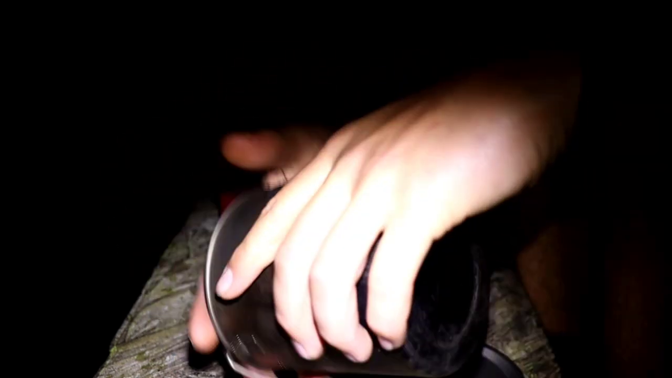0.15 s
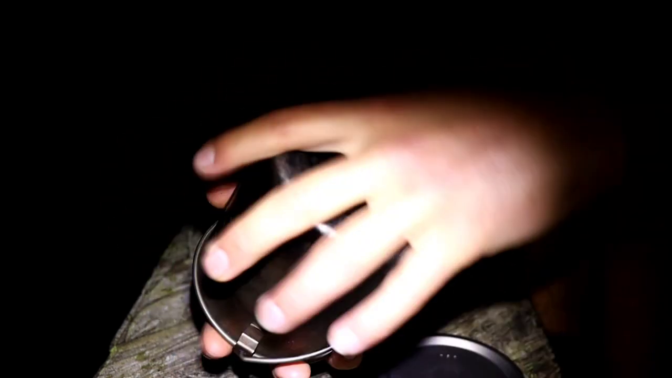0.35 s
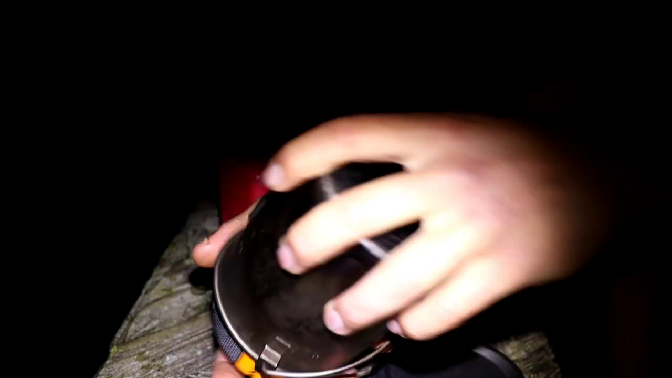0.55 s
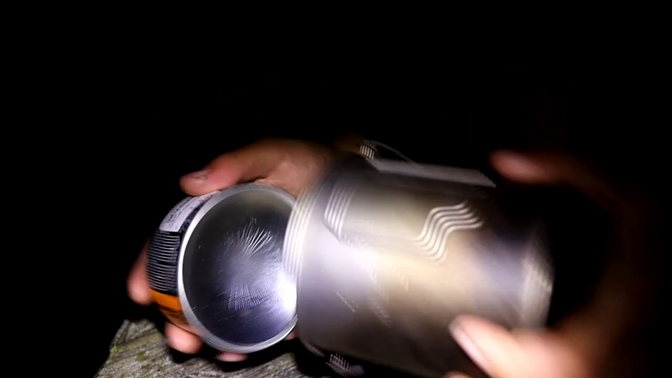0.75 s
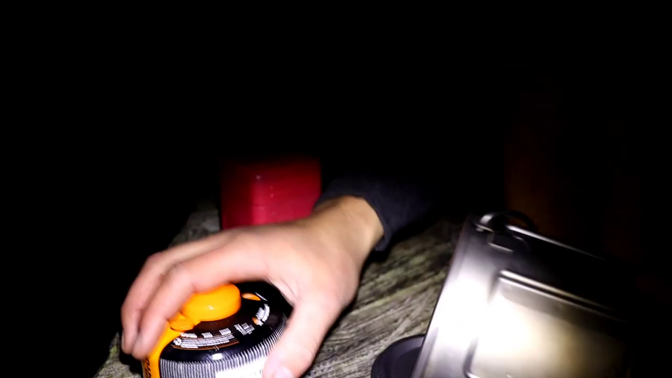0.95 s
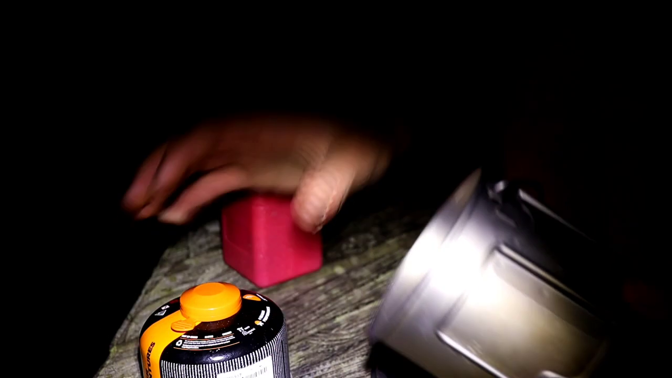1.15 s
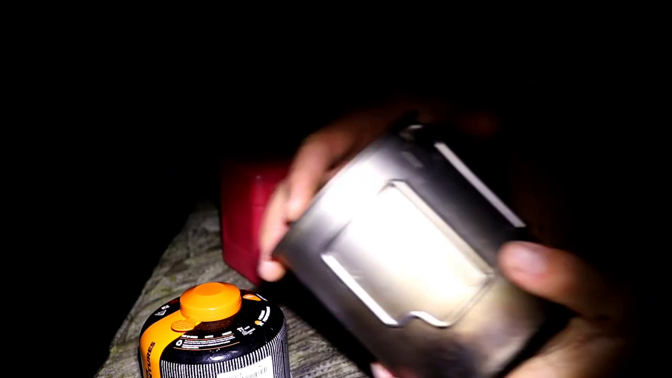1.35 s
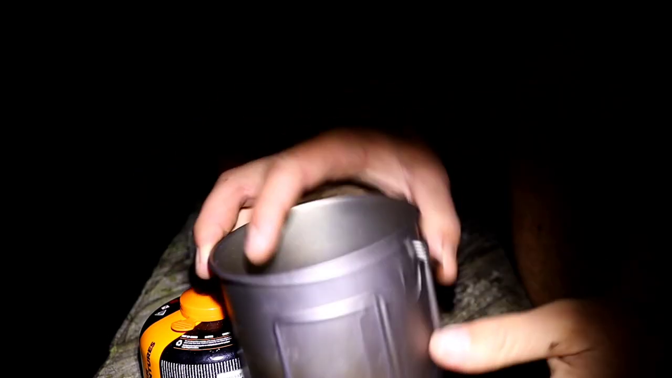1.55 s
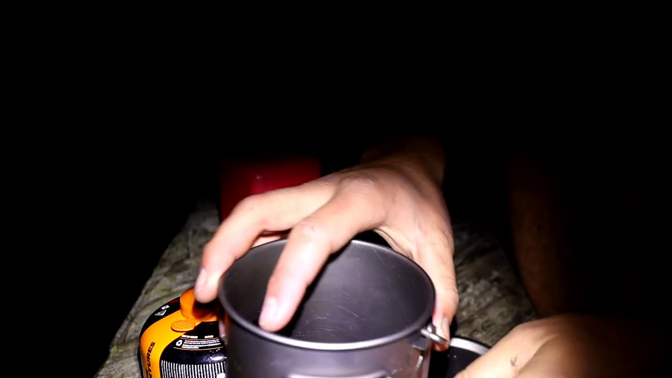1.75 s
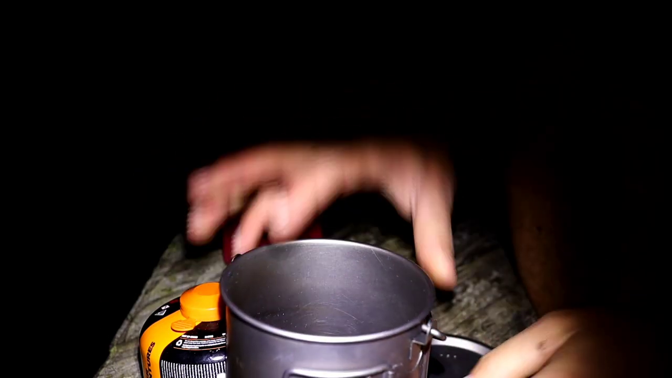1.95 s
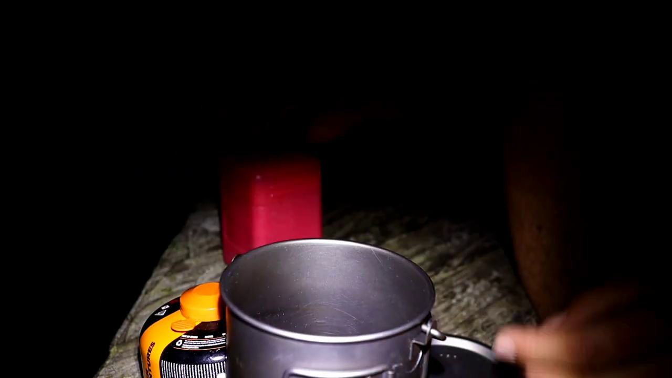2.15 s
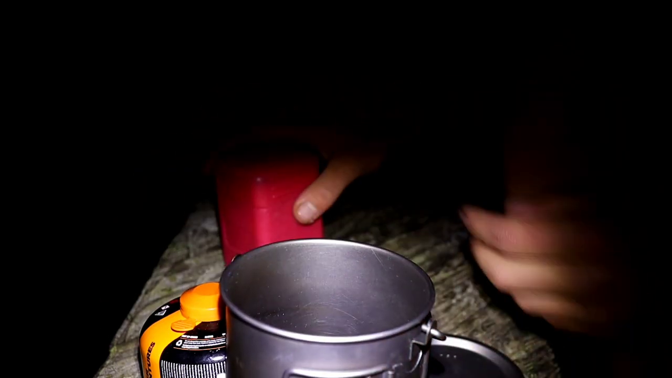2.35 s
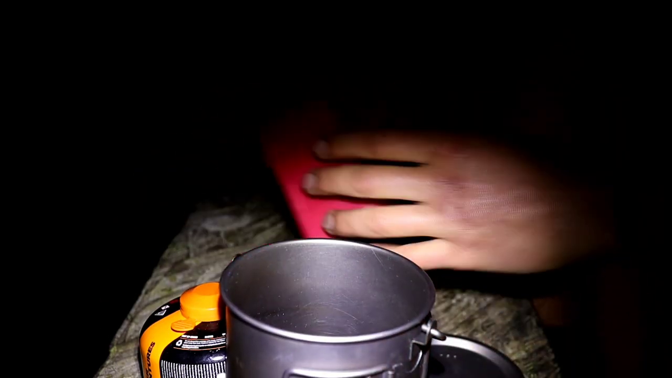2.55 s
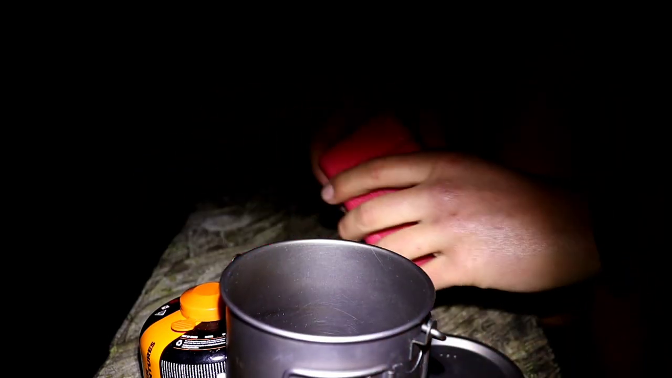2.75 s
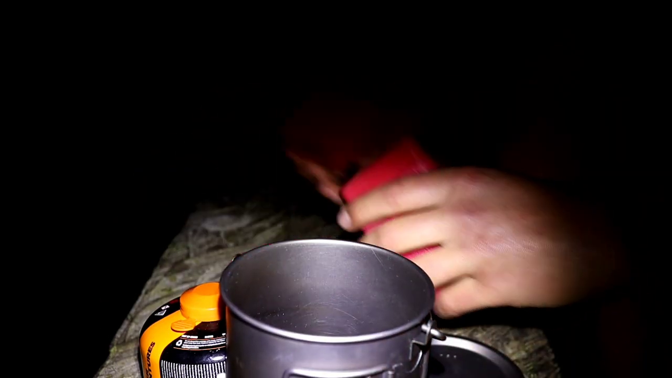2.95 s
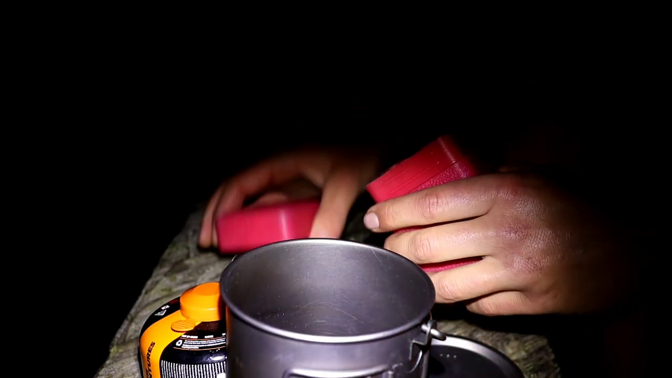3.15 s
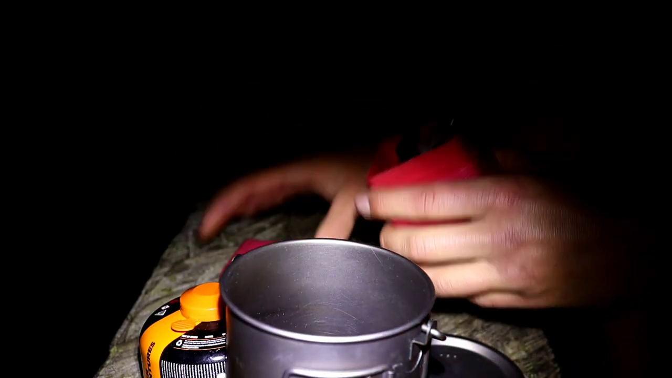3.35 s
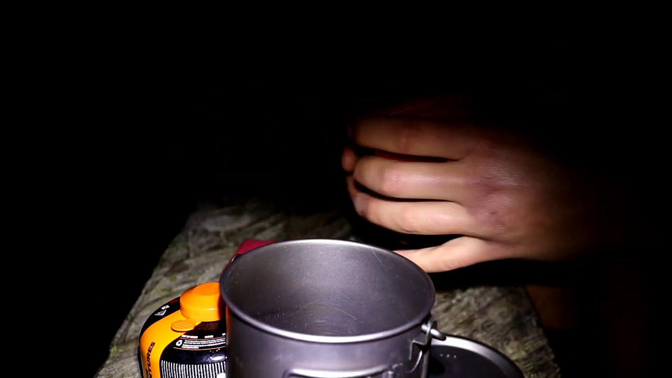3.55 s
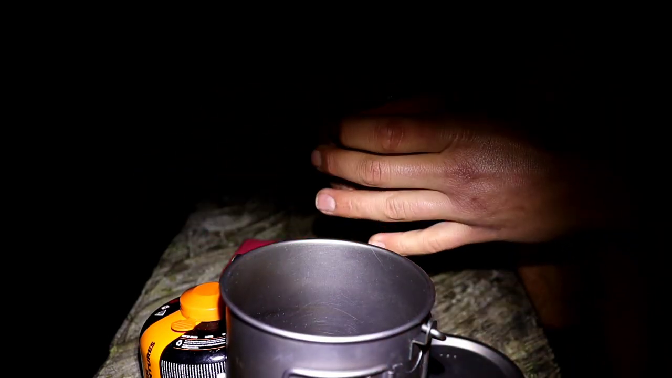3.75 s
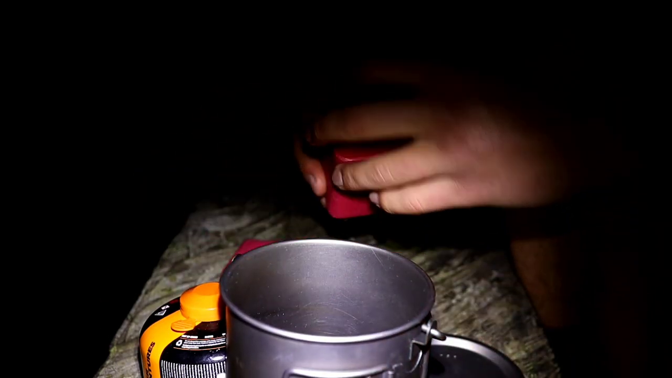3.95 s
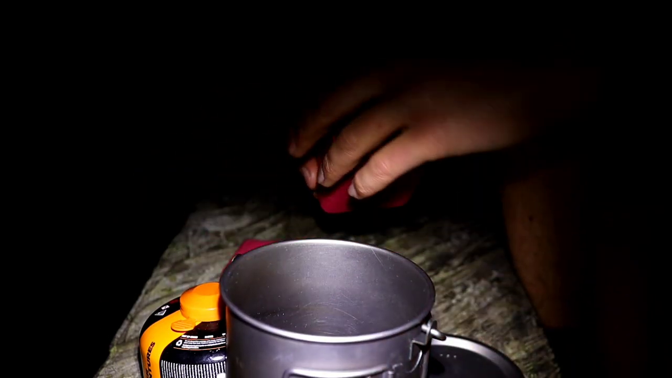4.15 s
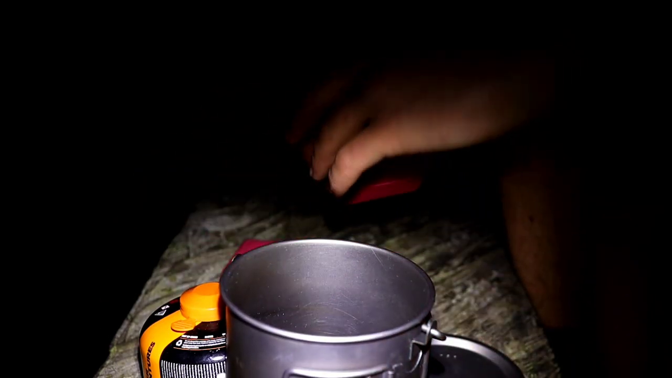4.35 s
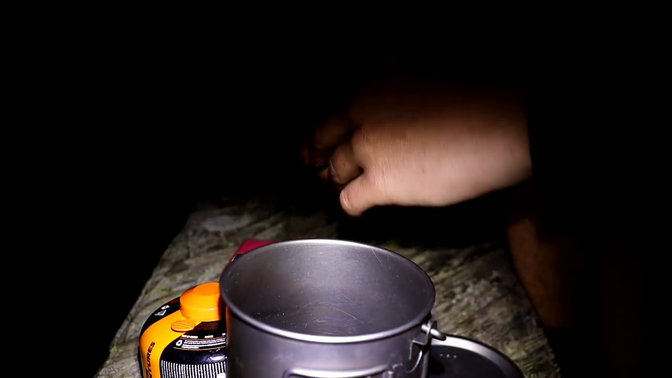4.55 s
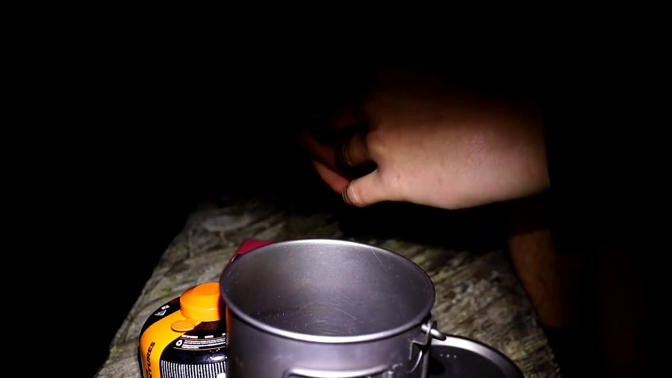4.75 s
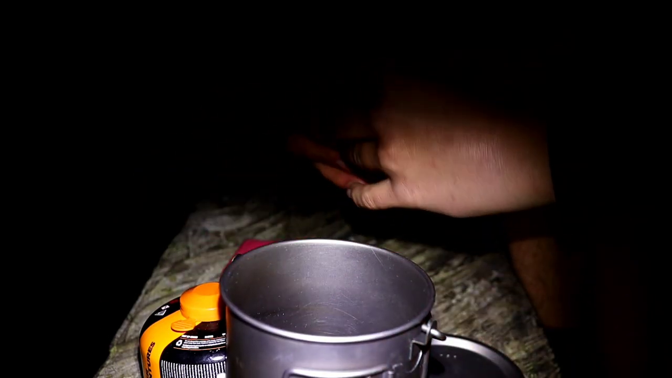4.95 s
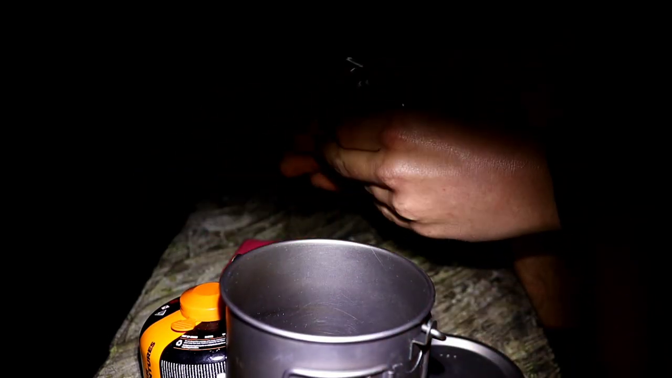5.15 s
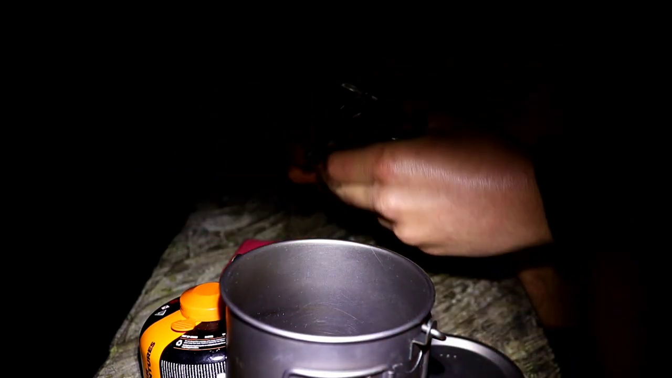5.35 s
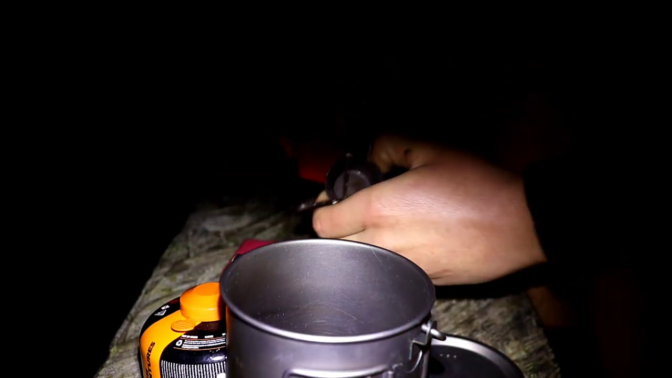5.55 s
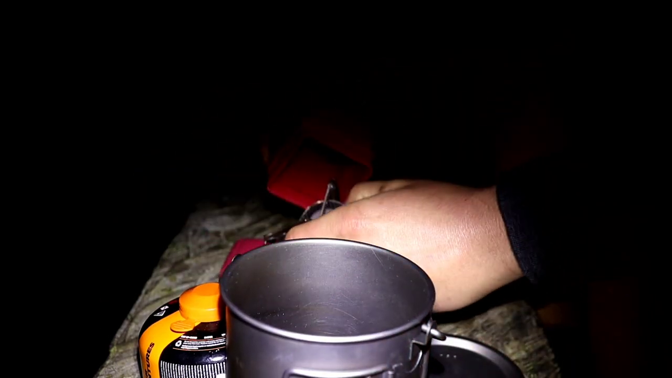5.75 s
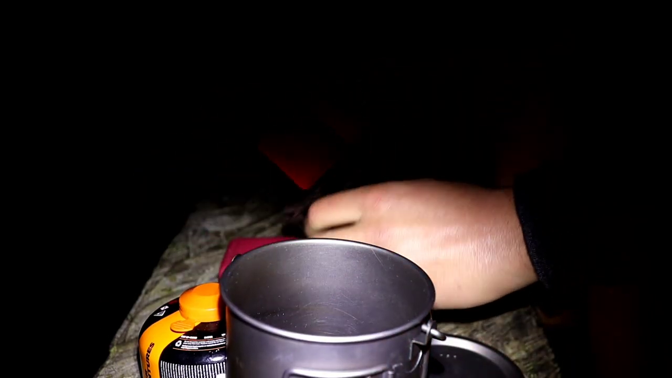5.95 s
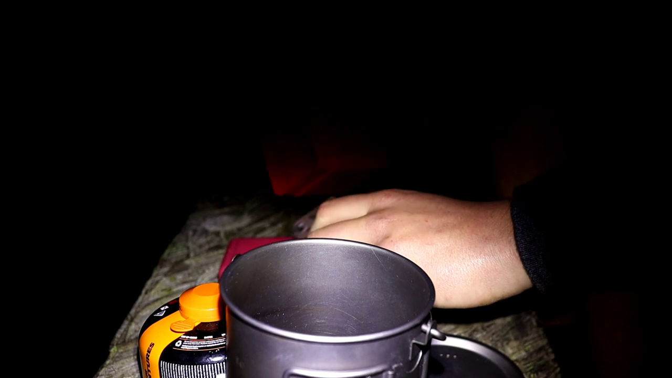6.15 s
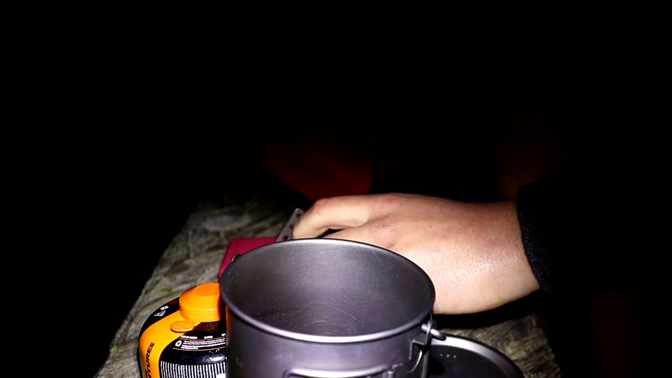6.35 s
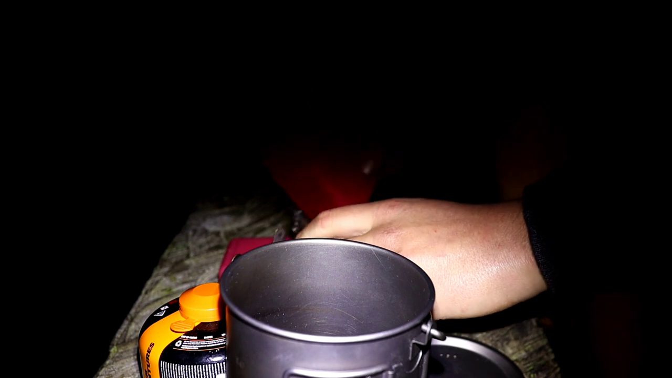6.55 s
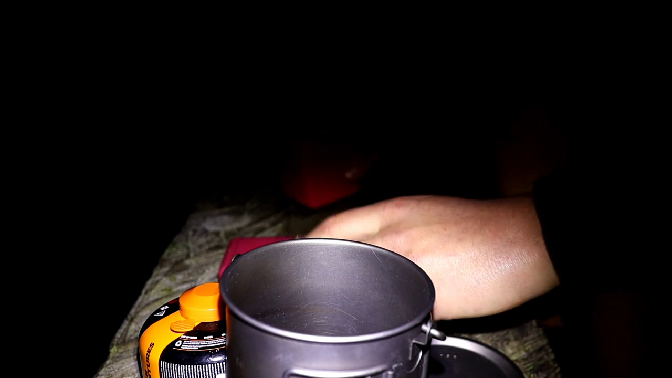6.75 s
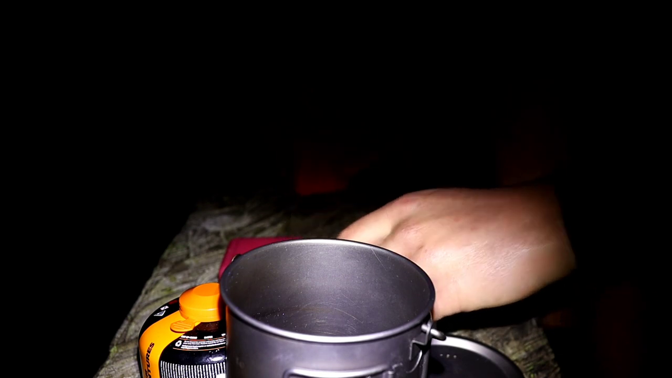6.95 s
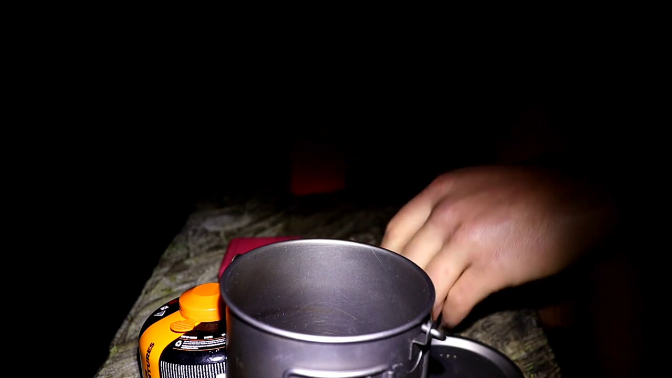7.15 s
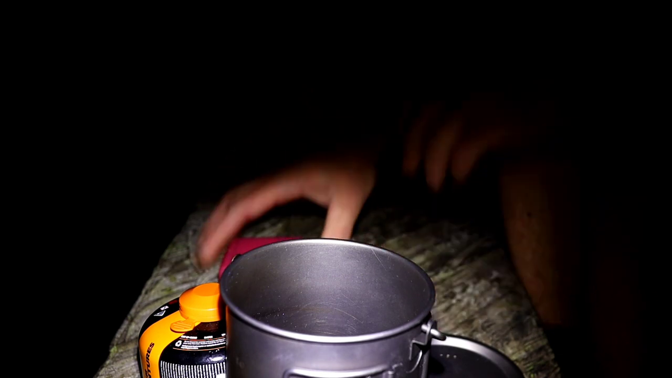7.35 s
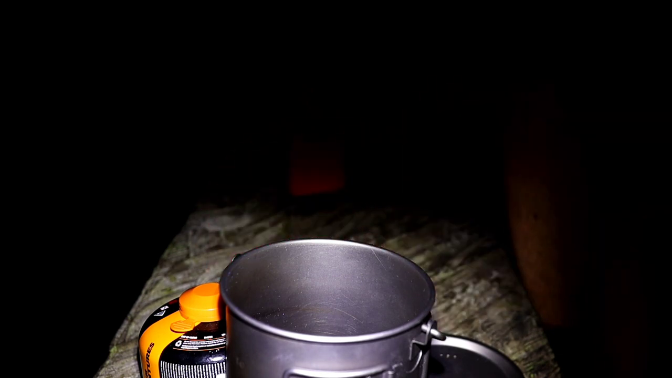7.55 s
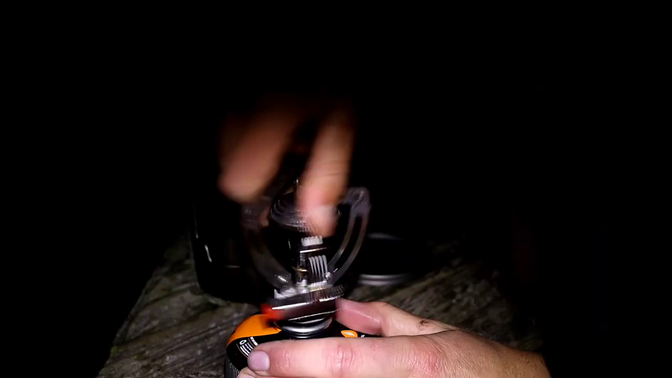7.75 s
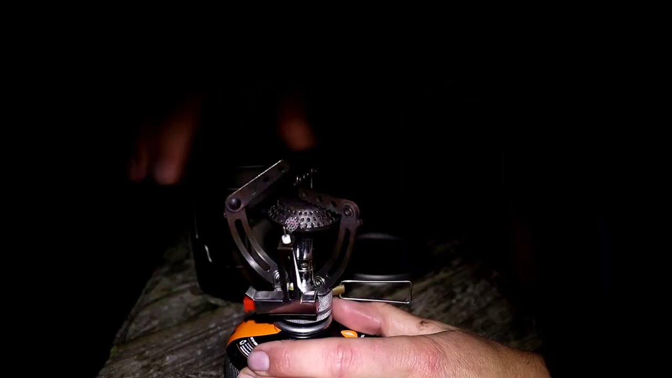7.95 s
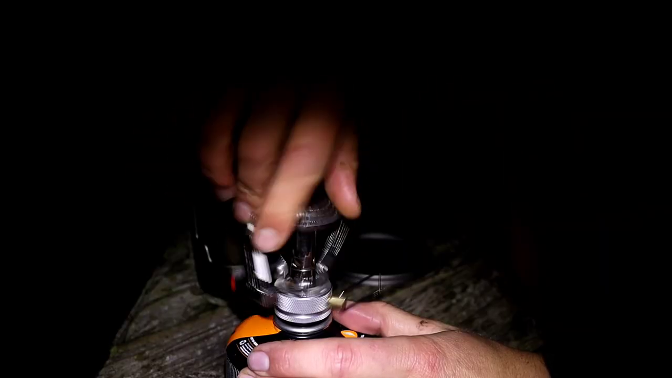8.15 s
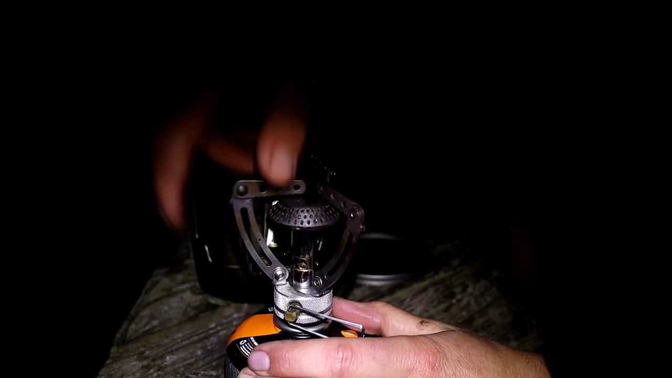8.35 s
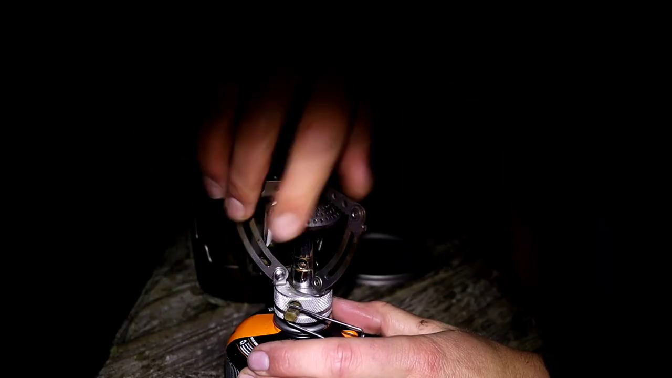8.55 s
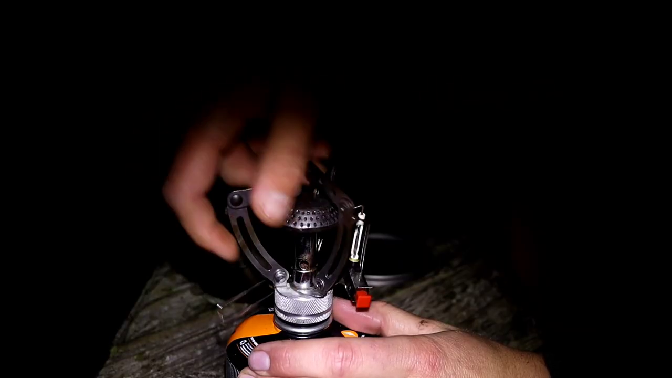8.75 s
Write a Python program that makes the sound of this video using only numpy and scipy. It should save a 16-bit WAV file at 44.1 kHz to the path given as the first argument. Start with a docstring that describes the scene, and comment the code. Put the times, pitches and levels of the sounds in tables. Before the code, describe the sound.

In a quiet night with faint crickets, a gas can is pulled from a thin metal mug with clacks, scraping and a short squeak. Both are set on a light wooden-sounding table with thumps. A folding stove is then shaken from a hard plastic box, with hollow knocks, sharp cracks and a clattering lid. The box is set down, the rustle cuts off, and light metal ticks follow. Close microphone.

```python
"""Throughout the night, shaped noise gives air and far crickets, and a light table sways on damped modes.
At first a gas can leaves a thin metal mug: clacks, squeak and friction excite wall modes, the air inside hums.
Both are set down on the table. From about 2.4 s a folding stove is shaken out of its plastic box: blows make
hollow knocks and noise cracks, low puffs swing the pressure, the loose lid drops twice and clatters to rest.
The empty box is set down; at 7.84 s the rustle breaks off with a click and a low bump, then small ticks ring."""
import sys
import numpy as np
from scipy import signal
from scipy.fft import rfft, irfft
from scipy.io import wavfile
from scipy.ndimage import uniform_filter1d

SR = 44100
rng = np.random.default_rng(int(sys.argv[2]) if len(sys.argv) > 2 else 0)


def to_wav(sig):
    """Store sig (one row per channel, or 1-D mono) as 16-bit WAV at the path in sys.argv[1].

    Samples outside -1..1 are clipped; the rate is SR.
    """
    pcm = np.clip(np.atleast_2d(sig), -1, 1) * 32767
    pcm = np.round(pcm).astype(np.int16)
    wavfile.write(sys.argv[1], SR, pcm.T)  # frames by channels


def elevation(decibels):
    """Turn decibel levels (scalar or array-like) into linear amplitude ratios."""
    levels = np.asarray(decibels, float)
    return 10 ** (levels / 20)


N = 388962  # samples


def evened(x):
    """Normalisation: scales a signal to rms 1."""
    return x / np.sqrt(np.mean(x ** 2) + 1e-20)


def coloured(points):
    """Spectral shaping: white noise is weighted to the given spectrum, at rms 1."""
    hz, db = np.transpose(points)
    f = np.fft.rfftfreq(N, 1 / SR)
    weight = elevation(np.interp(np.log(f + 1), np.log(hz + 1), db))
    return evened(irfft(rfft(rng.standard_normal(N)) * weight, N))


def drifting(shape, bins, frames):
    """Random field of rms 1, correlated over some frequency bins and time frames."""
    field = uniform_filter1d(rng.standard_normal(shape), size=bins, axis=0)
    return evened(uniform_filter1d(field, size=frames, axis=1))


def patchy(x, spread_db):
    """Time-varying resonance: narrow, short-lived peaks come and go in a noise of rms 1."""
    z = signal.stft(x, nperseg=512)[2]
    gain = elevation(spread_db * drifting(z.shape, 3, 4))
    return evened(signal.istft(z * gain, nperseg=512)[1][:N])


def whistle(hz, width):
    """Narrow-band noise: slow complex noise modulates a gliding carrier into a fuzzy note of rms 1."""
    r = np.exp(-np.pi * width / SR)
    noise = rng.standard_normal(N) + 1j * rng.standard_normal(N)
    slow = signal.lfilter([1], [1, -2 * r, r * r], noise)
    carrier = np.exp(2j * np.pi * np.cumsum(hz) / SR)
    return evened((slow * carrier).real)


def curve(rows, column):
    """Linear interpolation: reads one column of a table at every sample."""
    rows = np.array(rows)
    return np.interp(np.arange(N) / SR, rows[:, 0], rows[:, column])


def strikes(s, size):
    """Impulse train: one click of the given size at each time."""
    train = np.zeros(N)
    np.add.at(train, np.minimum((np.array(s) * SR).astype(int), N - 1), size)
    return train


def mode(x, hz, t60):
    """Damped oscillator: a click of size 1 rings as a dying sine of height 1."""
    r, w = 10 ** (-3 / (t60 * SR)), 2 * np.pi * hz / SR
    return signal.lfilter([0, np.sin(w)], [1, -2 * r * np.cos(w), r * r], x)


def rung(modes, s, blow_db, spread_db, tilt_db=0, grip=0):
    """Modal excitation: each blow lands elsewhere and wakes each mode differently; grip damps (1/s)."""
    luck = rng.standard_normal((len(s), len(modes)))
    middle_hz = modes[len(modes) // 2][0]
    out = np.zeros(N)
    for k, (hz, db, t60) in enumerate(modes):
        tilt = tilt_db * np.log2(hz / middle_hz)  # tilt_db is per octave
        clicks = strikes(s, elevation(blow_db + db + spread_db * luck[:, k] + tilt))
        out += mode(clicks, hz, 1 / (1 / t60 + grip))
    return out


def dying(s, size, t60):
    """Exponential decay: an envelope that jumps at each blow and dies away."""
    r = 10 ** (-3 / (t60 * SR))
    return signal.lfilter([1], [1, -r], strikes(s, size))


def clacks(blows, hollow_t60, crack_t60, tail_t60, tail_db, near_db, dull_db):
    """Cavity resonance and impact noise: a swelling hollow knock with beating notes, and a tailed crack."""
    s, knock_db, hz, clack_db, crack_db = np.transpose(blows)[:5]
    out, t = np.zeros(N + 8000), np.arange(8000) / SR
    swell = 1 - np.exp(-t / 0.0016)
    for start, f, db, luck in zip(s, hz, knock_db, rng.uniform(-1.3, 1, (len(s), 6))):
        near = f * (np.array([.8, 1.12, 1.35]) + 0.07 * luck[:3])  # other air and wall notes beat with it
        notes = np.sin(2 * np.pi * f * t)
        notes = notes + elevation(near_db + 1.6 * luck[3:]) @ np.sin(2 * np.pi * near[:, None] * t)
        decay = elevation(db - 60 * t / hollow_t60) + elevation(db - 20 - 60 * t / 0.11)
        out[int(start * SR):][:8000] += decay * swell * notes
    out = signal.sosfilt(signal.butter(2, 330, "high", fs=SR, output="sos"), out)  # no bass from small hollows
    dull = coloured([(90, -31.5), (250, -21.5), (600, 6.0), (1200, 2.5), (2000, -16.0), (2600, -50.5)])
    middle = coloured([(1200, -21.5), (1900, 3.5), (3000, 4.0), (5000, -4), (7000, -46.0)])
    bright = coloured([(3500, -32.0), (5200, 3.0), (8500, 5.5), (10500, -11.0), (13500, -4.0),
                       (16200, -23.5), (16600, -42.0)])
    middle, bright = patchy(middle, 4.5), patchy(bright, 4.)
    for noise, db in (dull, knock_db + dull_db), (middle, clack_db - 3.5), (bright, crack_db - 8.5):
        envelope = dying(s, elevation(db), crack_t60) + dying(s, elevation(db + tail_db), tail_t60)
        envelope = envelope - dying(s, elevation(db), 0.0016)  # softens the onset
        out[:N] += noise * envelope
    return out[:N]


# strokes of hands and things sliding: start t/s, length/s, dull rub level/dB, bright hiss level/dB
STROKES = [(0.099, 0.11, -46.5, -56), (0.206, 0.16, -33, -46.5), (0.399, 0.028, -42.5, -45.5),
           (0.464, 0.038, -43.5, -29.5), (0.561, 0.22, -39, -44), (0.795, 0.018, -21, -25.5),
           (0.892, 0.12, -65, -73.5), (1.483, 0.047, -45, -51.5), (1.554, 0.042, -45.5, -43),
           (1.632, 0.3, -56, -54.5), (2.031, 0.051, -38, -47.5), (2.447, 0.16, -49, -60.5),
           (2.689, 0.21, -51.5, -57), (3.008, .04, -40, -56), (3.053, 0.026, -32, -52),
           (3.469, 0.31, -58, -63), (3.679, 0.011, -45.5, -52), (3.824, 0.092, -61.5, -58),
           (3.945, 0.023, -51, -53.5), (4.238, 0.038, -46.5, -68.5), (4.4, 0.14, -55, -60.5),
           (4.755, 0.019, -55.5, -58.5), (4.892, 0.015, -47.5, -61.5), (5.086, 0.015, -57, -62.5),
           (5.284, 0.0035, -21.5, -27), (5.527, 0.01, -37.5, -38), (5.716, 0.053, -49, -52.5),
           (5.839, 0.16, -40.5, -56), (6.39, 0.16, -62.5, -64), (6.779, 0.12, -61.5, -67),
           (6.984, 0.16, -56, -59), (7.561, 0.02, -54, -63), (7.734, 0.13, -64, -58.5),
           (7.98, 0.047, -52, -65), (8.326, 0.023, -53.5, -70), (8.466, 0.013, -55, -65.5),
           (8.81, .03, -47.5, -61)]
RISE_DB_PER_S, FALL_DB_PER_S = 360, 305
SETTLE_DB, SETTLE_DB_PER_S = -27.5, 63.5  # a faint rustle lingers after each stroke
BREAK_S = 7.842  # the sound of earlier strokes breaks off abruptly


def stroked(column):
    """Energy summation: strokes that rise, hold, fall and settle add in power to one level."""
    t = np.arange(0, N + 64, step=64) / SR
    start, length, db = np.transpose(STROKES)[[0, 1, column], :, None]
    early, late = np.maximum(start - t, 0), np.maximum(t - start - length, 0)
    fall = elevation(-FALL_DB_PER_S * late) + elevation(SETTLE_DB - SETTLE_DB_PER_S * late)
    shape = elevation(-RISE_DB_PER_S * early) * fall
    shape = shape * ((start > BREAK_S) | (t < BREAK_S))
    return np.interp(np.arange(N) / SR, t, np.sqrt(((elevation(db) * shape) ** 2).sum(0)))


# spectrum of the air: f/Hz, relative level/dB per Hz
AIR = [(15, -33), (25, 3), (231, -3.5), (311, -1), (481, -5.5), (762, -7.5), (1030, -6), (1970, -14),
       (3210, -12.5), (4950, -10), (5670, -16.5), (14700, -21.5), (16300, -50)]
AIR_DB = -63  # rms
# far chorus: f/Hz, width/Hz, level/dB
CRICKETS = [(5100, 1000, -78)]
# wandering note of one cricket: t/s, f/Hz
NEAR_CRICKET = [(0, 5114), (3.8, 5220), (4.6, 4775), (5.2, 4790), (5.9, 5160), (8.82, 4630)]


def night():
    """Band-limited noise: soft air, a blurred chorus of far crickets and one wandering cricket note."""
    out = elevation(AIR_DB) * coloured(AIR)
    for hz, w, db in CRICKETS:
        band = [(hz - 2 * w, -40), (hz - w / 2, -3), (hz, 0), (hz + w / 2, -3), (hz + 2 * w, -40)]
        out = out + elevation(db) * coloured(band)
    return out + elevation(-76.5) * whistle(curve(NEAR_CRICKET, 1), 170.)


# things set down or jolted on the table top: t/s, sway level/dB, board level/dB
THUMPS = [(1.077, -19.5, -25.5), (1.113, -18, -23), (1.824, -19, -23.5), (2.008, -39, -38),
          (2.453, -30, -73), (3.428, -41, -57), (3.468, -35, -63), (5.696, -22, -27), (5.735, -34, -28),
          (5.825, -24.5, -30), (6.219, -15.5, -22.5), (6.813, -37, -57), (6.956, -22, -32.5),
          (7.083, -28.5, -38.5), (7.209, -33, -36), (7.533, -23.5, -52), (7.845, -26, -89),
          (7.978, -38.5, -62), (8.049, -29.5, -55), (8.304, -26, -46.5), (8.366, -28, -46),
          (8.466, -27, -49.5), (8.598, -33, -77), (8.757, -33, -49), (8.795, -29, -56)]
# table trembling under the hands: t/s, level/dB
TREMBLE = [(0, -36), (.15, -60), (1.06, -83), (1.1, -40.5), (1.7, -67), (2.42, -55.5), (2.5, -42),
           (3.1, -77.5), (5.65, -79), (5.72, -55.5), (6.2, -40), (6.7, -55.5), (8.82, -46.5)]
# modes of the table on its legs: f/Hz, relative level/dB, t60/s
SWAY = [(42.7, -16.5, 0.19), (76.15, -3, 0.53)]
# modes of the table top: f/Hz, relative level/dB, t60/s
BOARD = [(294, -2, .24), (345, -7, .15), (440, -3, .09), (585, -14, .2), (702, 0, .15), (915, -9, .12),
         (1017, -13, .15), (1093, -9, .13), (1147, -2, .12), (1204, -10, .11), (1277, -8, .14)]


def table():
    """Modal response: thumps excite leg sway and board modes, dragging drives the board, hands tremble it."""
    s, sway_db, board_db = np.transpose(THUMPS)
    low = coloured([(15, 13.0), (28, 2.0), (41, 22.5), (52, -6.5), (75, -2.5), (100, -41.0)])
    tremble = elevation(curve(TREMBLE, 1)) * low
    on_board = np.arange(N) > 5.6 * SR  # parts lie on the board
    dragged = elevation(-32.5) * stroked(column=2) * on_board * rng.standard_normal(N)
    board = rung(BOARD, s, board_db, 4.6, -4. * (s > 7.8))
    board = board + sum(elevation(db) * mode(dragged, hz, t60) for hz, db, t60 in BOARD)
    struck = rung(SWAY, s, sway_db, 0.) + board
    blunt = signal.butter(4, 2500., fs=SR, output="sos")  # a blunt contact makes little treble
    return signal.sosfilt(blunt, struck) + tremble


# low puffs as the tight box gives way; the last is a low bump where the rustle breaks off: t/s, level/dB
PUFFS = [(3.024, -33), (3.061, -22), (5.29, -30), (7.843, -36.5)]
PUFF_S = 0.0015  # from the peak to the zero crossing


def puffs():
    """Pressure pulse: one rounded swing of pressure each, without ring."""
    s, db = np.transpose(PUFFS)
    u = np.arange(-400, 400) / (PUFF_S * SR)
    pulse = (1 - u ** 2) * np.exp(-u ** 2 / 2)
    return signal.oaconvolve(strikes(s, elevation(db)), pulse, "same")


# spectrum of the dull rub: f/Hz, relative level/dB per Hz
RUB = [(88, -35), (150, -14.5), (475, 0), (602, -1), (798, 8), (1050, -10.5), (1160, -3.5), (2500, -10.5),
       (3250, -42), (5500, -120)]
# spectrum of the bright hiss: f/Hz, relative level/dB per Hz
HISS = [(880, -50.5), (1500, -20), (1910, -4.5), (2110, -7), (2400, -1), (4410, 0.5), (8710, -2),
        (10200, -13), (13800, -10), (15900, -20), (16300, -39)]


def slide():
    """Granular friction: uneven grains, a few of them large, modulate noise whose colour drifts in patches."""
    on_metal = np.arange(N) < 2.2 * SR
    grains = elevation(8.4 * np.minimum(rng.exponential(1, N), 4)) * (rng.random(N) < 500 / SR)
    grains = grains * np.where(on_metal, 0.7, 1)  # smooth metal catches less
    grainy = evened(0.5 + signal.lfilter([1], [1, -np.exp(-1 / 350.0)], grains))
    # smooth metal rubs with less dull noise than plastic
    rub = grainy * elevation(-7 * on_metal) * stroked(column=2) * coloured(RUB)
    hiss = evened(np.sqrt(grainy)) * stroked(column=3) * patchy(coloured(HISS), 3.)
    z = signal.stft(rub + hiss, nperseg=256)[2]
    gain = elevation(2.8 * drifting(z.shape, 5, 14))
    return signal.istft(z * gain, nperseg=256)[1][:N]


# air in the mug, lowest while the can half closes it: t/s, f/Hz, hum level/dB
CAVITY = [(.12, 542, -74), (.3, 515, -84), (.39, 477, -43), (.42, 470, -31.5), (.5, 323, -67),
          (.54, 303.4, -25), (.64, 284.3, -44.5), (.67, 312, -34), (.72, 344.7, -53), (.76, 425.6, -33),
          (.795, 720, -44.5), (.825, 1102, -70), (.9, 633, -94)]


def cavity():
    """Cavity resonance: the air volume in the mug hums a wavering note that moves with the can."""
    note = np.sin(2 * np.pi * np.cumsum(curve(CAVITY, 1)) / SR)
    return np.sqrt(2) * elevation(curve(CAVITY, 2)) * note  # sqrt(2) brings a sine to rms 1


# modes of the plastic walls: f/Hz, relative level/dB, t60/s
PLASTIC = [(2300, -11, .07), (2450, 1, .05), (2940, 1, .055), (3110, -4, .04), (3430, -11, .05)]


def piece(hits, hz, crack_db, walls_db):
    """Fixed cavity resonance: a plastic piece nearly keeps its hollow note at each hit; its walls ring."""
    s, knock_db, clack_db = np.transpose(hits)
    note = hz * (1 + .02 * rng.standard_normal(len(s)))
    blows = np.transpose([s, knock_db, note, clack_db - 2, clack_db + crack_db])
    walls = rung(PLASTIC, s, clack_db + walls_db, 2.8)
    return clacks(blows, 0.023, 0.013, 0.098, -10, -12.5, -19.0) + walls


# the loose lid drops twice and clatters to rest: t/s, hollow knock level/dB, clack level/dB
LID_HITS = [(3.436, -2, -17.5), (3.446, -13.5, -32.5), (3.4512, -3.5, -22.5), (3.4635, -16, -30),
            (3.4685, 1, -12), (3.473, 0.5, -16), (3.499, -6, -22.5), (3.511, -5.5, -37.5),
            (3.516, -9, -27.5), (3.529, -17, -37), (3.54, -17.5, -34), (3.546, -28, -41),
            (3.559, -25.5, -41.5), (5.823, -3, -5.5), (5.853, -4, -27), (5.867, -5, -21), (5.934, -3, -24),
            (5.956, -11.5, -30), (5.971, -17.5, -40.5), (5.99, -23, -42), (6.02, -28.5, -45.5)]
# modes of the lid: f/Hz, relative level/dB, t60/s
LID = [(940, -5, .12), (1060, -2, .14), (1160, -6, .2), (1270, -5, .2)]
# mode of the lid's rim, free on the first drop only: f/Hz, relative level/dB, t60/s
RIM = [(4280, -5, 0.027)]
# the empty box is nudged and set down: t/s, hollow knock level/dB, clack level/dB
EMPTY_HITS = [(6.975, -3, -22.5), (6.996, -8, -27.5), (7.012, -10, -37.5), (7.177, -11.5, -33),
              (7.212, -9, -33.5), (7.271, -20.5, -54), (7.308, -38, -55), (7.49, -41.5, -69),
              (7.534, -7.5, -26.5), (7.554, -18, -28.5), (7.799, -28.5, -67)]
# modes of the empty box: f/Hz, relative level/dB, t60/s
EMPTY = [(680, -2, .14), (740, -3, .1), (851, -10, .12), (947, -8, .1), (1230, -8, .08), (1755, -4, .05),
         (3040, -12, .05)]


def loose_parts():
    """Repeated impact: lid and empty box knock at their own hollow notes and ring their own modes."""
    s, knock_db, clack_db = np.transpose(LID_HITS)
    lid = piece(LID_HITS, 1142, -14.5, walls_db=-6) + rung(LID, s, knock_db - 24.0, 1.9)
    lid = lid + rung(RIM, s[s < 4], clack_db[s < 4], 3.)
    s, knock_db, _ = np.transpose(EMPTY_HITS)
    empty = piece(EMPTY_HITS, 932, -7.5, walls_db=-11.5) + rung(EMPTY, s, knock_db - 23.0, 4.4)
    return lid + empty


# blows of can, filled box and stove:
# t/s, hollow knock level/dB, hollow f/Hz, clack level/dB, crack level/dB
BOX_BLOWS = [(1.076, -2.5, 1379, -33.5, -51), (1.113, -4.5, 1190, -33, -32),
             (2.478, -26.5, 770, -30.5, -29.5), (2.546, -27, 800, -31, -26.5),
             (2.569, -26.5, 464, -40, -42), (2.675, -8.5, 545, -32.5, -37), (2.692, -49, 543, -36.5, -28),
             (2.805, -40, 580, -37, -36.5), (2.863, -29.5, 533, -40, -57), (2.903, -27, 465, -39, -50.5),
             (3.026, -18.5, 670, -23.5, -26.5), (3.043, -26, 600, -39.5, -42.5),
             (3.06, -18, 802, -23.5, -26), (3.066, -9.5, 818, -20, -25), (3.0733, -5, 759, -13, -15),
             (3.097, -12, 805, -24, -16), (3.122, -14.5, 780, -29, -42), (3.136, -36, 814, -31, -39),
             (3.263, -12, 850, -22, -33), (3.394, -23, 767, -33.5, -40), (3.641, -30, 910, -37.5, -29),
             (3.656, -19.5, 772, -36.5, -59), (3.871, -25, 1033, -37, -57), (3.927, -14, 960, -26, -28.5),
             (4.268, -24.5, 627, -30.5, -27.5), (4.385, -26.5, 758, -31, -45),
             (4.731, -23.5, 743, -47, -67), (5.104, -34, 453, -41, -54), (5.226, -17, 565, -50.5, -48.5),
             (5.248, -29, 564, -29, -20), (5.292, 2.5, 663, -11.5, -2.5), (5.327, -70, 586, -36.5, -28),
             (5.463, -10, 710, -19, -24), (5.485, -13.5, 598, -25.5, -20), (5.501, -12.5, 698, -18, -13),
             (5.534, -11, 711, -22, -25), (5.623, 1, 874, -14.5, -12.5), (5.694, -3.5, 685, -20, -5),
             (5.732, -9, 690, -17.5, -16), (5.904, -22, 694, -20.5, -22.5), (6.205, -22.5, 1110, -35, -63),
             (6.217, -4, 665, -38, -31), (6.816, -35, 1000, -46.5, -46), (6.957, -3.5, 725, -26, -28.5),
             (7.083, -44, 710, -34.5, -17.5), (7.109, -23, 695, -35, -27.5)]
# small hard ticks of loose parts; the one at 7.842 s is a click where the rustle breaks off:
# t/s, hollow knock level/dB, hollow f/Hz, clack level/dB, crack level/dB
TICKS = [(2.76, -62.5, 690, -40, -40.5), (4.2, -37.5, 650, -51, -45.5), (4.227, -41, 685, -45.5, -60.5),
         (4.253, -30, 562, -45, -56.5), (4.529, -41, 650, -43, -55), (4.918, -37, 711, -46, -61),
         (6.745, -42, 708, -44, -48), (6.071, -38, 667, -46.5, -41), (6.116, -37.5, 714, -48, -43),
         (7.842, -38.5, 507, -44, -41), (7.861, -36.5, 370, -66, -67.5), (7.91, -47, 1440, -42, -31),
         (7.958, -45, 1160, -53, -56), (7.985, -47, 720, -38.5, -37), (8.039, -57, 740, -42, -39),
         (8.061, -45, 1130, -36.5, -38.5), (8.267, -42.5, 408, -62, -61), (8.295, -45, 1210, -60, -66),
         (8.304, -36, 730, -36, -39), (8.325, -45, 873, -43, -49), (8.365, -38, 1153, -57, -60),
         (8.474, -50, 1190, -50, -51), (8.5, -45.5, 1180, -54, -59), (8.759, -40.5, 1282, -45.5, -40),
         (8.801, -33, 404, -44, -26.5)]
# the folded stove strikes metal on metal: t/s, level/dB, brightness/dB per octave
STOVE_RINGS = [(3.66, -53.5, -27), (3.87, -57, -21.5), (5.503, -40, 0), (5.851, -27.5, 0.5),
               (6.226, -44, -8)]
# modes of the folded stove: f/Hz, relative level/dB, t60/s
STOVE = [(2444, -14, .2), (2900, -8, .12), (3553, -4, .16), (4081, -5, .07), (4290, 0, .1), (4619, -4, .16),
         (6083, -2, .14), (6988, -2, .15), (8409, -10, .1)]
# modes of the stove unfolded on the can: f/Hz, relative level/dB, t60/s
BURNER = [(1238, 2, .15), (2342, -4, .1), (2783, -5, .1), (4210, -5, .1), (4888, -3, .12)]


def box():
    """Impact and modal ringing: can, box and stove clack, plastic walls snap, the stove rings thinly."""
    s, knock_db, _, clack_db, _ = np.transpose(BOX_BLOWS)
    walls = rung(PLASTIC, s, clack_db - 18.5, 0.71)
    open_hum = mode(strikes(s, elevation(knock_db - 14.5) * (s > 5.4)), 696, .13)  # open box hums
    s, _, _, clack_db, _ = np.transpose(TICKS)
    late = s > BREAK_S
    metal = rung(STOVE, s, clack_db - 21 - 9 * late, 4, grip=14.)
    metal = metal + rung(BURNER, s[late], clack_db[late] - 17.5, 2.7)
    s, ring_db, tilt_db = np.transpose(STOVE_RINGS)
    metal = metal + rung(STOVE, s, ring_db, 0.58, tilt_db)
    blows = clacks(BOX_BLOWS, 0.021, 0.022, 0.13, -14, -10.5, -15.0)
    ticks = clacks(TICKS, 0.035, 0.0174, 0.044, -14.5, -7, -13.0)
    return blows + ticks + walls + open_hum + metal


# blows on the mug: t/s, hollow knock level/dB, clack level/dB, crack level/dB
MUG_BLOWS = [(.122, -25, -61.5, -36), (0.146, -16.5, -41.5, -43.5), (0.165, -12.5, -12, -13),
             (.192, -12.5, -35.5, -50), (.238, 1.5, -10, -18), (0.28, -11.5, -25.5, -33),
             (0.289, -34.5, -23.5, -27.5), (0.313, -8, -17.5, -13), (.379, -9.5, -38, -25),
             (0.527, -24, -33, -17), (0.55, -21.5, -22, -33.5), (0.656, -35, -32, -32.5),
             (0.723, -26, -25, -28.5), (.738, -25, -29.5, -26.5), (0.79, -39, -30.5, -23.5),
             (0.82, -14, -5.5, -0.5), (0.841, -27, -15, -22), (1.46, -51, -56, -40),
             (1.533, -25, -28, -21.5), (1.824, -1, -15.5, -11.5), (1.932, -27, -50.5, -37),
             (2.007, -21.5, -33.5, -31.5), (2.062, -19.5, -32.5, -55)]
# modes of the thin metal walls: f/Hz, relative level/dB, t60/s
MUG = [(778, -9, .2), (943, -10, .28), (1385, -12, 1.15), (2040, -13, .2), (2200, -10, .2),
       (2335, -11, .11), (2541, 0, .31), (2568, -15, .25), (3262, -6, .16), (3557, 0, .12), (3730, -6, .12),
       (3878, -5, .1), (4052, -6, .2), (4650, -15, .22), (4861, -15, .15), (5373, -18, .19),
       (5870, -14, .2), (6700, -18, .2), (7050, -17, .2), (7680, -15, .17)]
# the can's rim squeaks against the mug wall: t/s, f/Hz, level/dB
SQUEAK = [(.57, 3500, -71.5), (.61, 3320, -37), (.66, 3200, -45), (.7, 3290, -56), (.79, 3280, -39),
          (.83, 3245, -77)]


def mug():
    """Shell modes: blows and sliding grit excite thin metal walls and bottom, and a palm damps them."""
    s, knock_db, clack_db, crack_db = np.transpose(MUG_BLOWS)
    ring_db = np.maximum(clack_db, crack_db) - 19.5  # follows the harder of clack and crack
    air_hz = curve(CAVITY, 1)[(s * SR).astype(int)]
    blows = np.transpose([s, knock_db, air_hz, clack_db, crack_db])
    t, loose = np.arange(N) / SR, s < 1.07
    grit = elevation(-35) * stroked(column=3) * rng.standard_normal(N)
    stirred, rubbed = np.zeros(N), np.zeros(N)
    for hz, db, t60 in MUG:
        octaves = np.log2(hz / 3000)
        stirred += elevation(db - 11.0 + 3.5 * octaves) * mode(grit * (t < 1), hz, t60)
        held_grit = grit * (t > 1.4) * (t < 2.2)
        rubbed += elevation(db - 10.0 + 5.6 * octaves) * mode(held_grit, hz, 1 / (1 / t60 + 3.3))
    palm = np.interp(t, [1.07, 1.09], [1, .06])  # a palm closes on the wall
    free = palm * (rung(MUG, s[loose], ring_db[loose], 2.5) + stirred)
    held = rung(MUG, s[~loose], ring_db[~loose] + 8, 2.5, 4, grip=3.)
    rubbing = elevation(-34.5) * stroked(column=2) * (t < 2.2) * rng.standard_normal(N)
    push = strikes(s, elevation(knock_db - 9.5)) + rubbing
    standing = t > 1.8  # resting on the table lowers the bottom's note
    bottom = mode(push * ~standing, 795, 0.11)
    bottom = bottom + elevation(4.5) * mode(push * standing, 748, 0.14)
    bottom = bottom + elevation(-3.5) * mode(push * standing, 587, 0.14)
    squeak = elevation(curve(SQUEAK, 2)) * (t < 1) * whistle(curve(SQUEAK, 1), 250.)
    clack = clacks(blows, 0.045, 0.041, 0.12, -22, -17.0, -12.5)
    return clack + free + held + rubbed + bottom + squeak


def scene():
    """Superposition: all sources add in one channel."""
    background = night() + table() + puffs() + slide()
    return (background + cavity() + loose_parts() + box() + mug())[None]


def band_limit(x):
    """A steep low-pass at the top of the band."""
    return signal.sosfilt(signal.butter(12, 16490, fs=SR, output="sos"), x)


def record(dry):
    """Amplitude limiting: any peak beyond full scale clips."""
    mix = np.clip(dry, -1, 1)
    return band_limit(mix)


dry = scene()
out = record(dry)
to_wav(out)
```